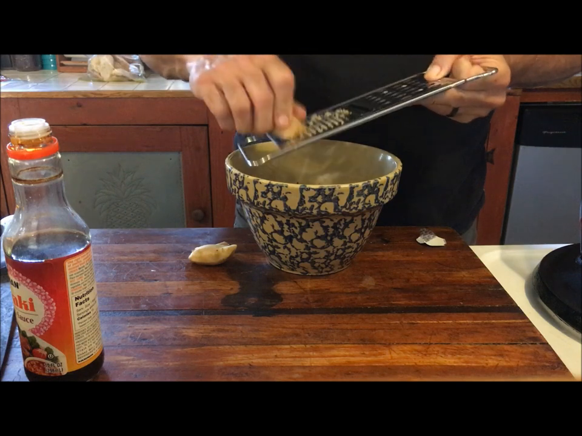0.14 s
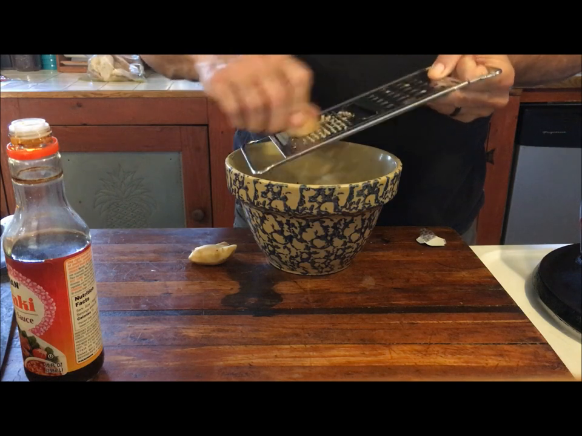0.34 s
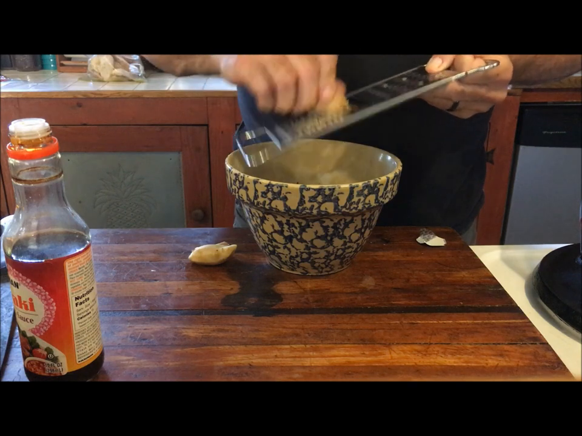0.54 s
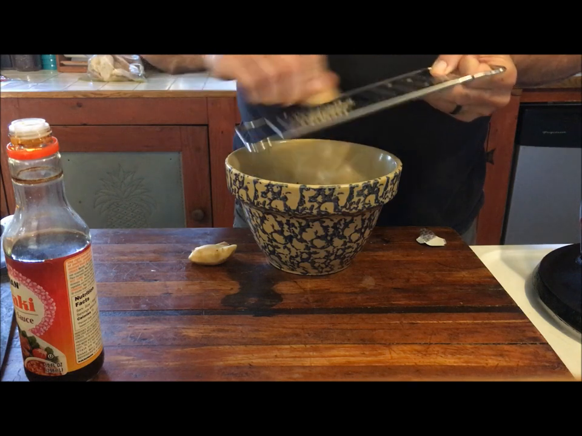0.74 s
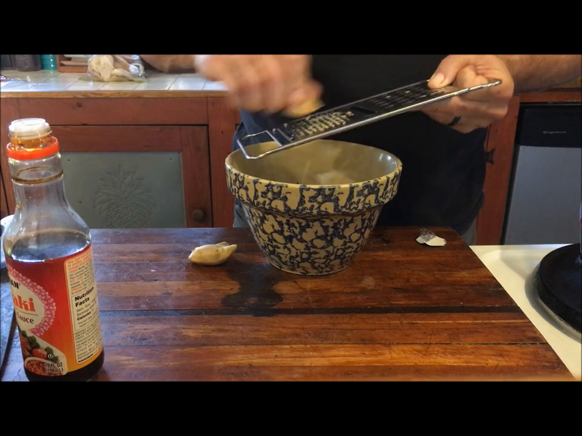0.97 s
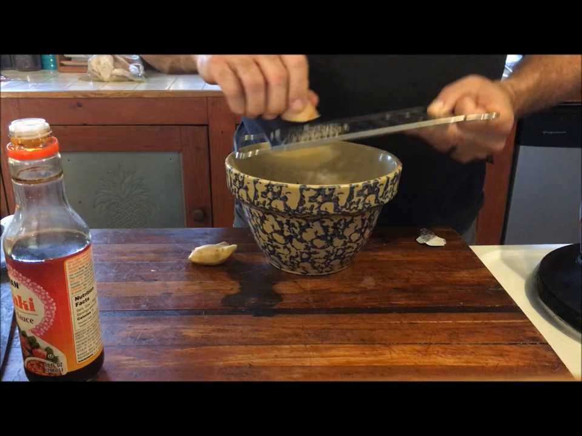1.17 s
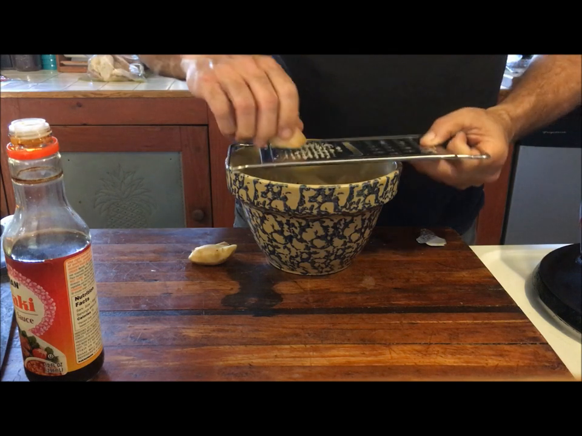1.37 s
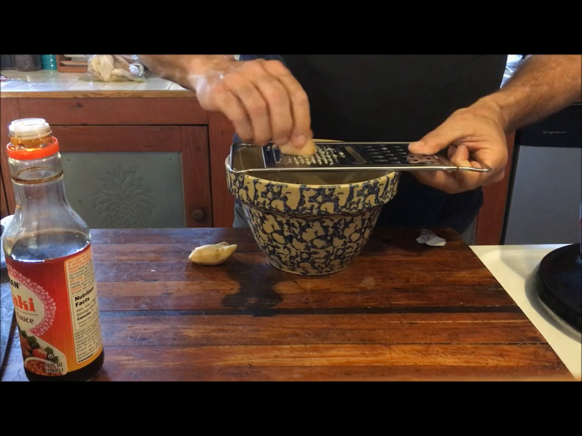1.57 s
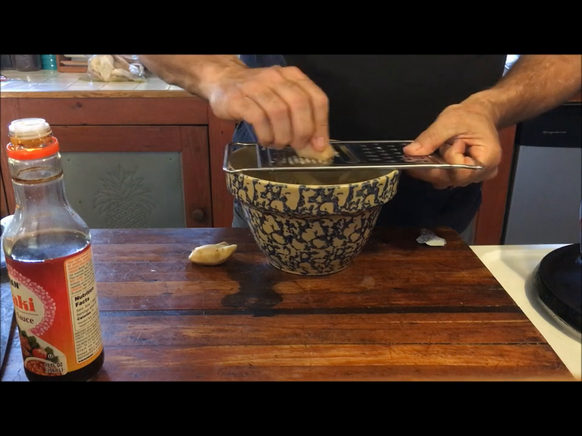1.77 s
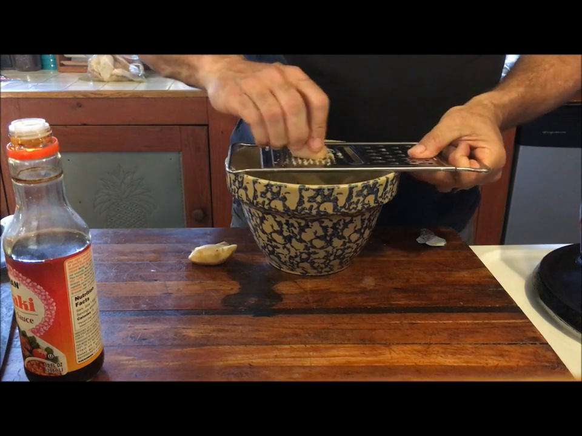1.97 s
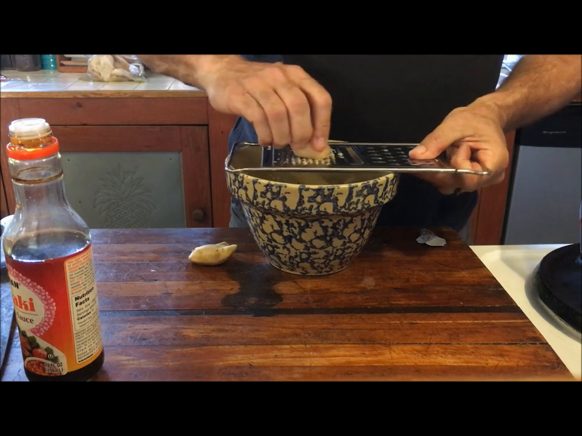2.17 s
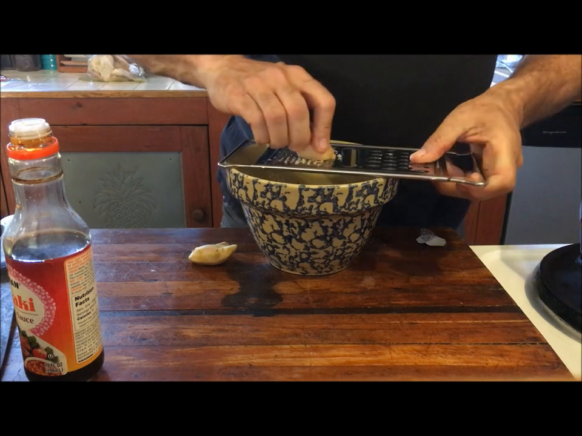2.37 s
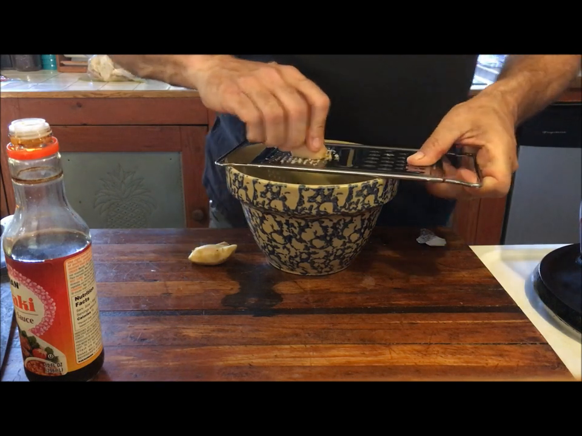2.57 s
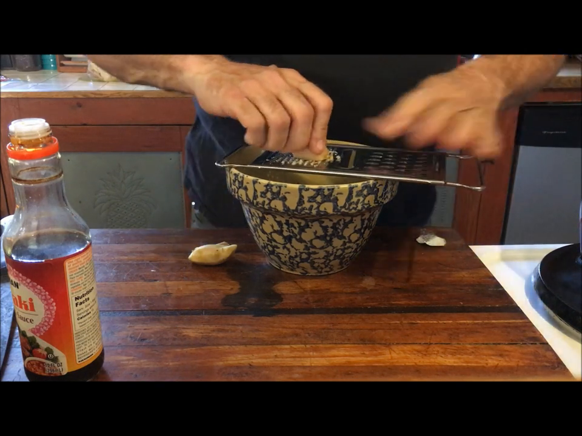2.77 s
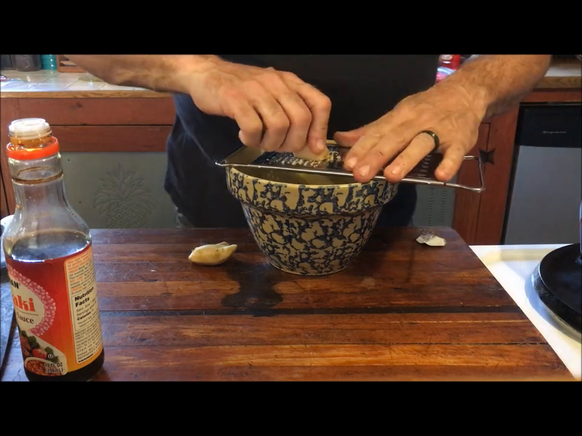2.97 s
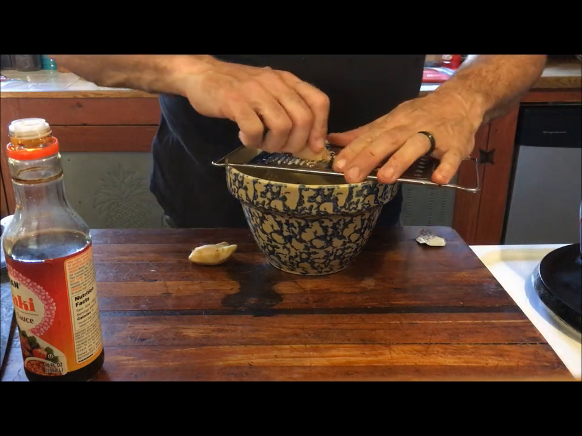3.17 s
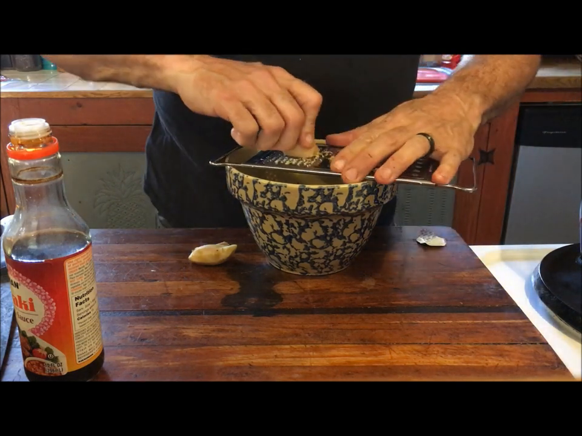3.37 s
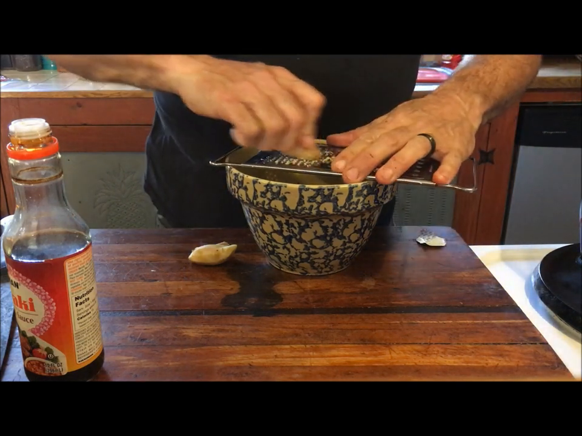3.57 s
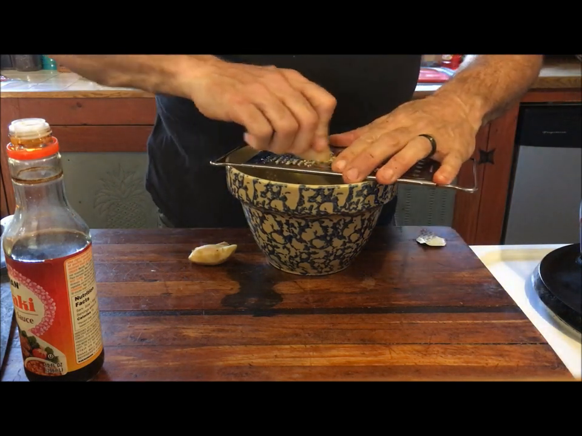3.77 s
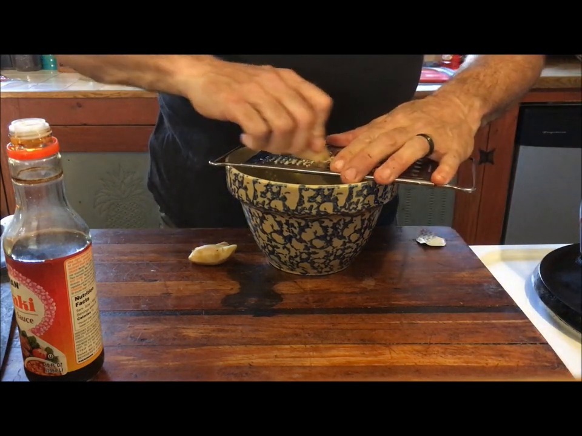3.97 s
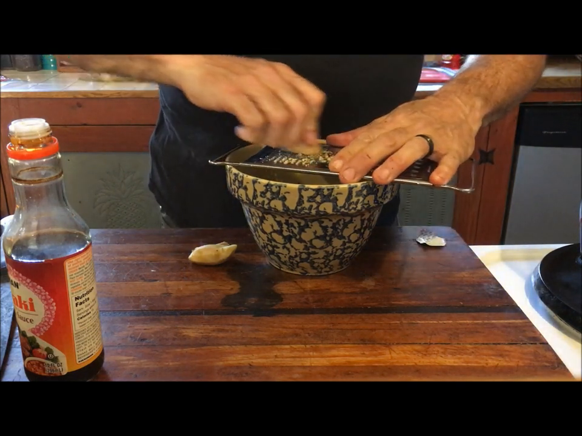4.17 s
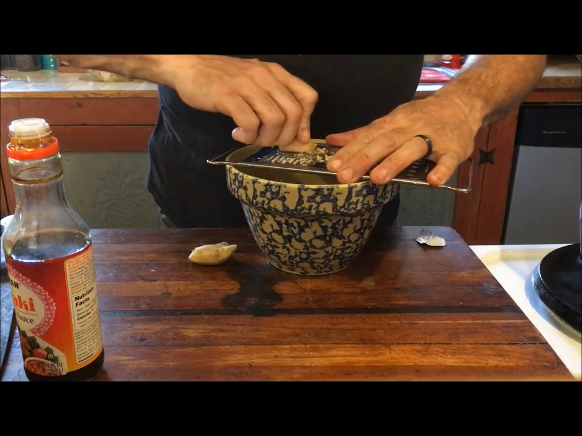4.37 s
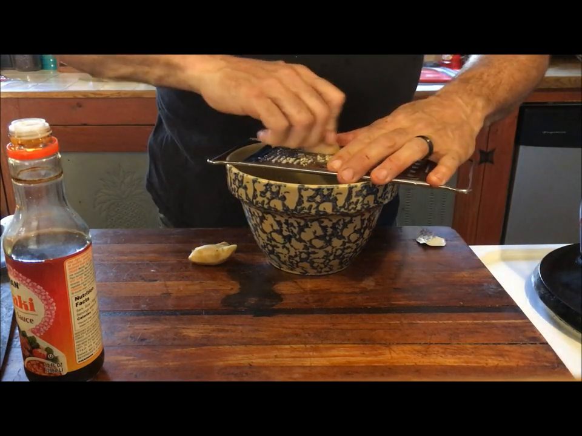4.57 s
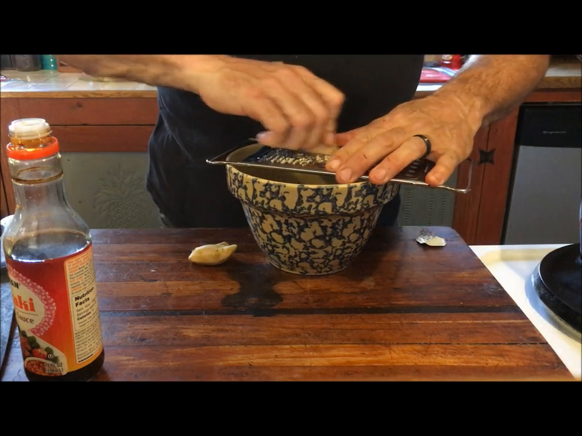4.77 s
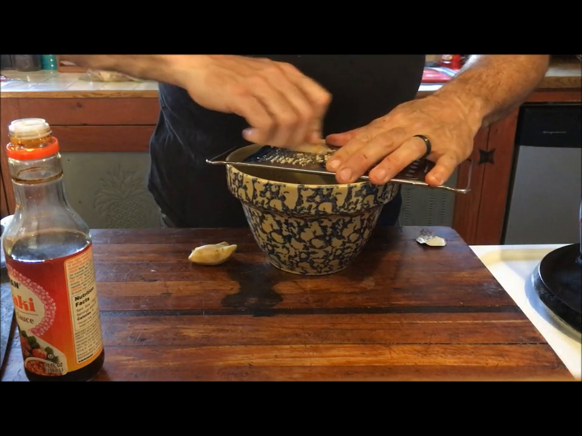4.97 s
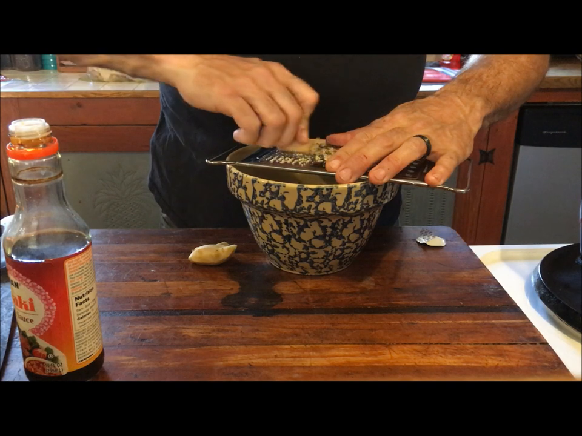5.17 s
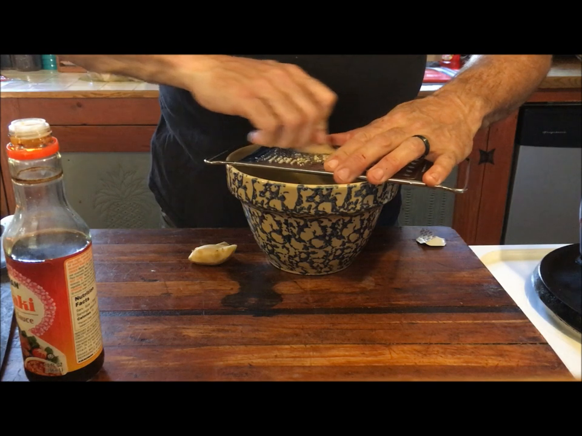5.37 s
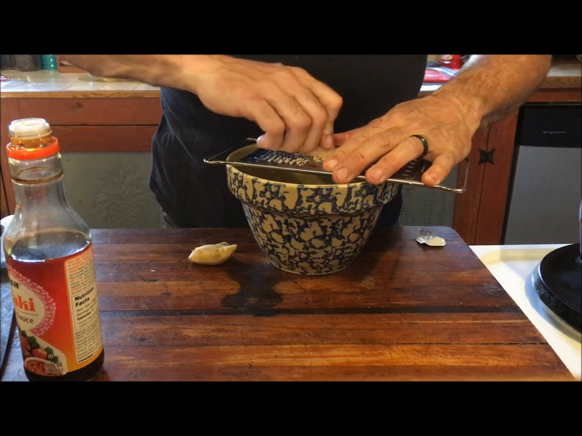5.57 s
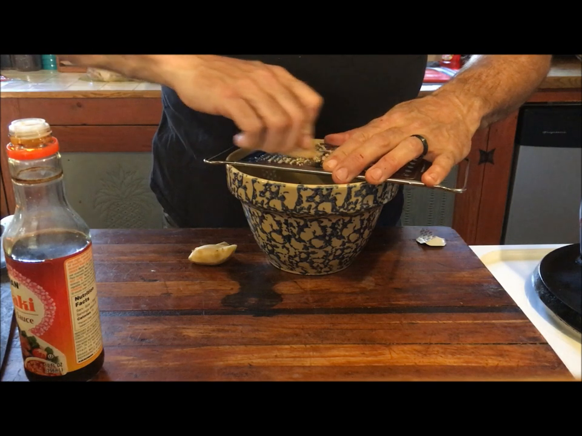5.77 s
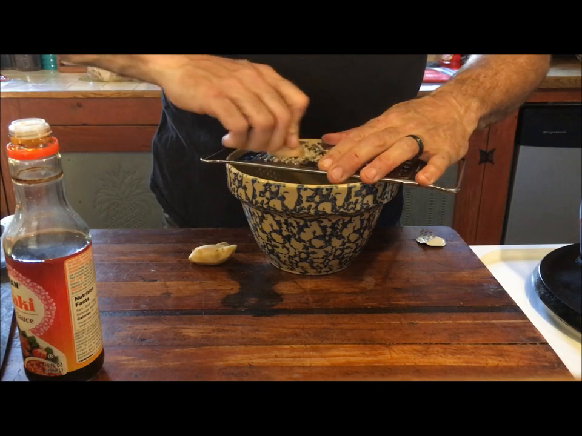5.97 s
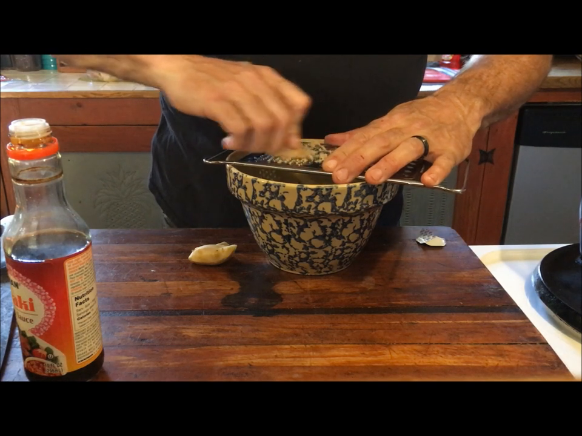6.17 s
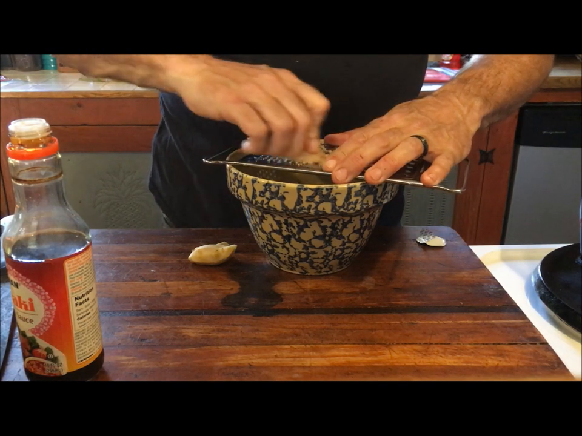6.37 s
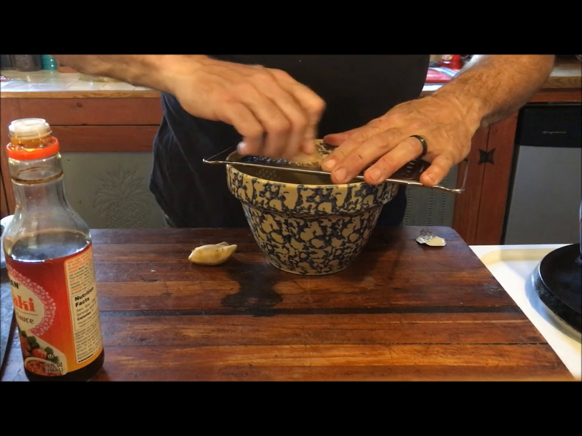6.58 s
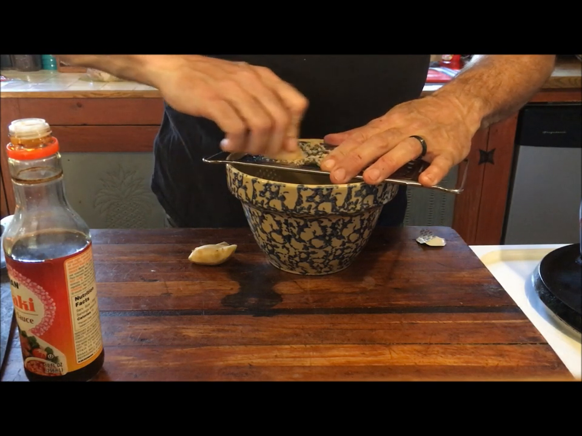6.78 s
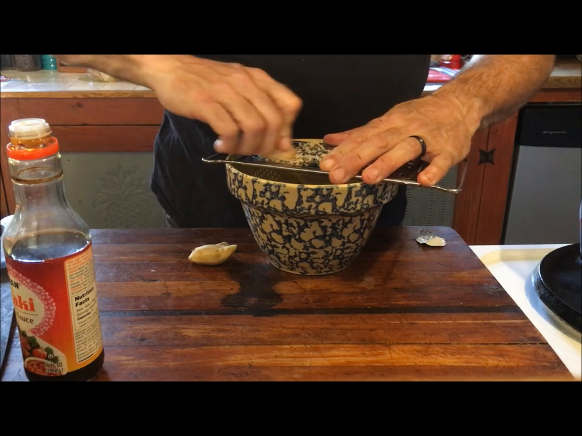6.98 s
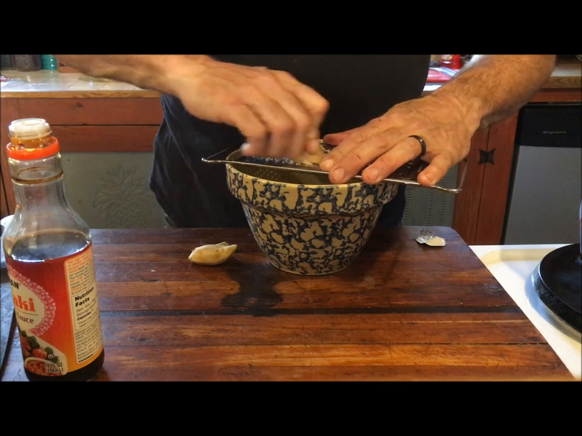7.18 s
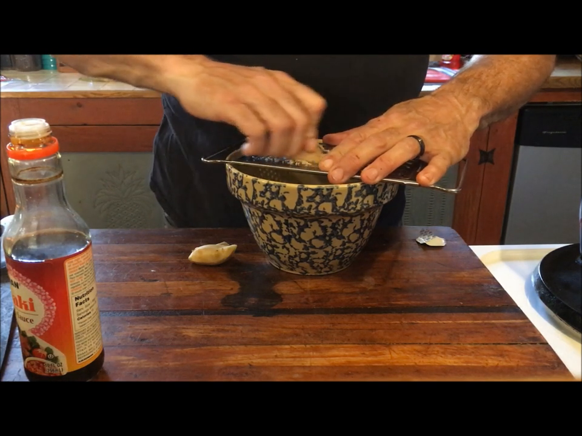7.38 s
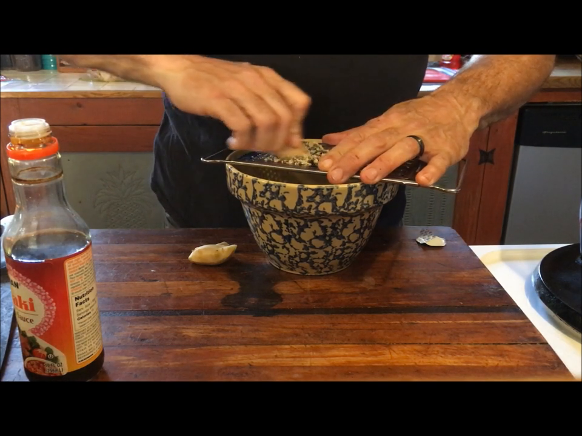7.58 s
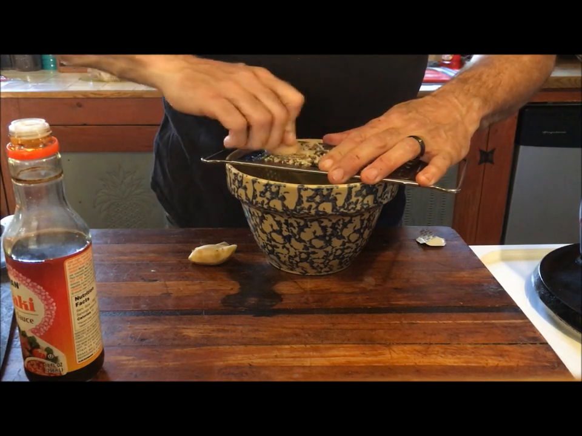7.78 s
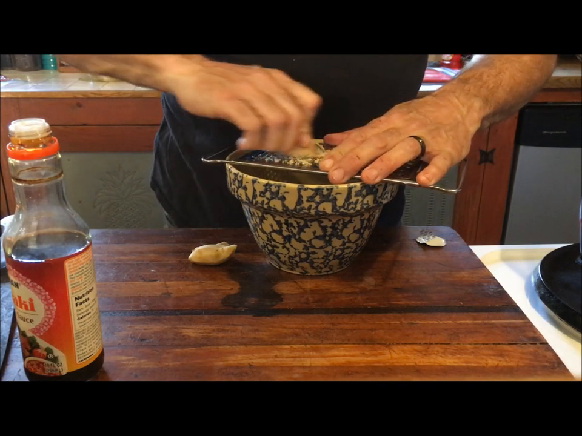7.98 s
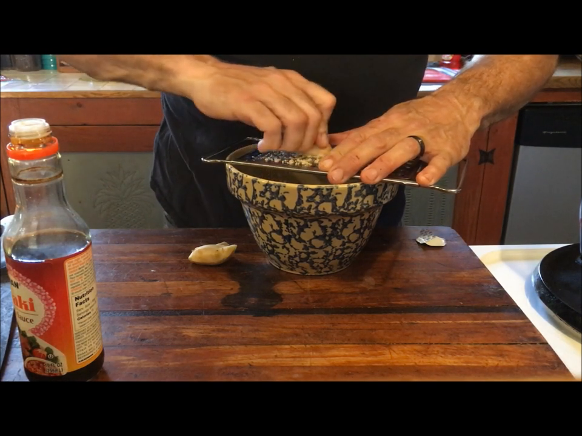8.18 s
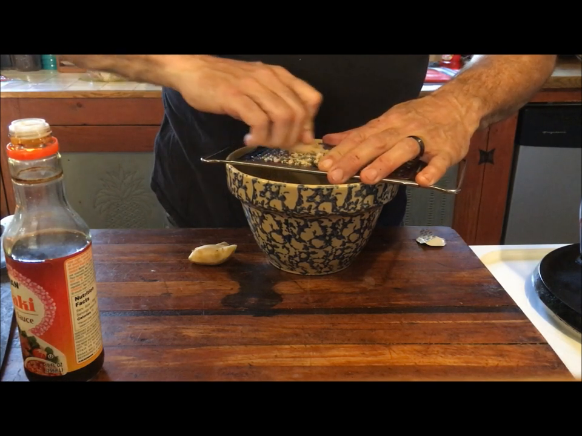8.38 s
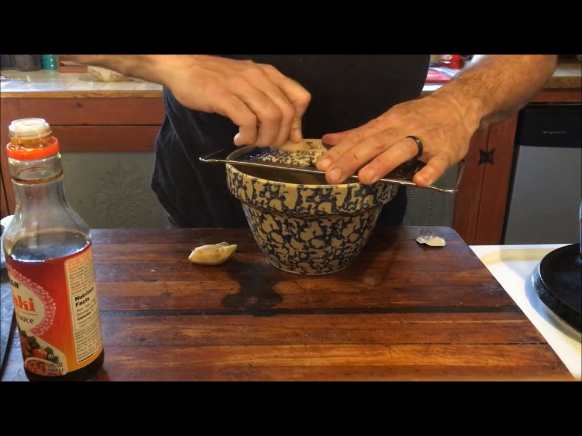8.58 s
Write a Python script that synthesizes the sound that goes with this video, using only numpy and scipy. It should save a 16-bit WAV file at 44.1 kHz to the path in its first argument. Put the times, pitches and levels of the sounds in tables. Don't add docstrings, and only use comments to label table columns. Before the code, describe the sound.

Ginger root rasped on a steel grater over a stoneware bowl: a few light scrapes, bright rim clinks, then fast hissing strokes with wooden knocks.

```python
import sys
import numpy as np
from scipy import signal
from scipy.fft import rfft, irfft
from scipy.io import wavfile
from scipy.ndimage import uniform_filter1d

SR = 44100
rng = np.random.default_rng(int(sys.argv[2]) if len(sys.argv) > 2 else 0)


def to_linear_factor(level_db):
    exponent = np.asarray(level_db, float) / 20
    return 10 ** exponent


def bounce(signal):
    frames = np.transpose(np.atleast_2d(signal))
    limited = np.clip(frames, -1, 1)
    pcm = np.round(limited * 32767).astype(np.int16)
    wavfile.write(sys.argv[1], SR, pcm)


N = 380564

# f/Hz, level/dB
KITCHEN_TONE = [(15, -65), (25, -26.5), (53, -6.5), (74, -6.5), (134, -29), (256, -26.5), (309, -33.5),
                (439, -31), (489, -42.5), (1700, -63.5), (16000, -76)]
# f/Hz, time to fade by 60 dB/s
ECHO_TIMES = [(80, 0.91), (300, 0.27), (1200, 0.5), (5000, 0.27), (14000, 0.17)]

# f/Hz, level/dB, time to fade by 60 dB/s
COUNTER_LOW = [(85.4, -13, 0.69), (96.6, -9, 0.37), (144.3, 2, 0.15), (181.6, -2.5, 0.17),
               (200.5, -5, 0.17)]
COUNTER_MID = [(253, -16, 0.1), (288.4, -1, 0.18), (338, -0.5, 0.035), (381.2, -1.5, 0.13),
               (433, -3.5, 0.054)]
COUNTER_HIGH = [(466, -1, 0.023), (553.6, -8, 0.07), (616.7, 1, 0.038), (703, 0, 0.04), (807, -3.5, 0.038)]
COUNTER_TOP = [(1000, -13, 0.12), (1115, 14, 0.05), (1222, 7.5, 0.047), (1327, 19.5, 0.028),
               (1714, 10, 0.029), (2010, 4.5, 0.012)]
# f/Hz, level/dB
THUD_TONE = [(24, -29.5), (45, -33.5), (144, 9.5), (278, -5.5), (421, -6.5), (490, -16), (620, -12.5),
             (800, -17), (999, -25), (1250, -23), (2210, -42), (2500, -34.5), (3250, -65), (5500, -120)]
# t/s, peak level/dB, sharp part below it/dB, body below it/dB
KNOCKS = [(0.653, -35.5, -13, -12), (1.282, -39, -29, -14), (1.908, -41, -25, -5), (3.43, -38, -16, -24),
          (3.69, -35.5, -23, -29), (3.784, -31, -19, -14), (3.894, -24, -9.5, -12.5), (4.098, -43, -7, -9),
          (4.403, -22.5, -16.5, -10), (4.658, -18.5, -9.5, -11.5), (4.852, -29.5, -30, -15),
          (4.924, -22, -5.5, -12), (5.189, -19, -7, -14.5), (5.371, -24, -23, -17),
          (5.452, -21, 0.5, -12.5), (5.639, -33.5, -26, -37), (5.703, -25.5, -17, -11),
          (5.884, -28, -20, -24), (5.963, -21.5, -9.5, -14), (6.229, -18, -5, -15.5),
          (6.473, -20.5, -5, -12), (6.679, -26, -22, -11.5), (6.739, -18, -1.5, -22.5),
          (6.994, -16, -0.5, -16.5), (7.19, -25, -30, -18), (7.273, -28, -25, -11), (7.45, -25, -10.5, -15),
          (7.526, -26.5, -10, -12), (7.785, -26.5, -16.5, -14), (8.049, -23, -7, -11),
          (8.238, -55, -16, -20), (8.341, -35, -10, -19), (8.464, -54.5, 9.5, -16), (8.586, -17, -1.5, -19)]

# f/Hz, level/dB, time to fade by 60 dB/s
BOWL_HUM = [(692, 1, .06), (637, -4, 0.054), (743, -7.5, .04)]
# f/Hz, level/dB, time to fade by 60 dB/s
BOWL = [(689, 14, 0.064), (744, 8.5, 0.022), (1277, 9, 0.084), (2620, -0.5, 0.11), (3200, -9.5, 0.17),
        (4120, -2, 0.03), (4740, 2, 0.03)]
# f/Hz, level/dB, time to fade by 60 dB/s
RIM_HIGH = [(4245, 0, .055), (4200, -5, .045), (4290, -5, .05), (4255, -19, .11), (4465, -13, .05),
            (4050, -14, .03)]
RIM_LOW = [(2335, 0, .075), (2280, -5, .05), (2395, -6, .05), (2730, -10, .06), (3000, -12, .03)]

# f/Hz, level/dB, time to fade by 60 dB/s
FREE_RASP = [(430, 0, 0.035), (500, -3, .03), (685, -1, 0.035)]
FREE_RASP_TOP = [(800, 0, .06), (1080, -8, .02), (1250, -12, .015)]
# f/Hz, level/dB, time to fade by 60 dB/s
FRAME_HELD = [(900, 3, .04), (1900, -3, .04), (640, -5, 0.031), (1390, -15.5, .05), (3250, -16, .03)]
FRAME_LAID = [(920, -10, 0.071), (1357, 0.5, 0.083), (1390, 1, 0.024), (1060, -3, 0.018), (1940, -5, 0.071),
              (655, -2.5, 0.055), (3250, -5, 0.043)]
# f/Hz, level/dB, time to fade by 60 dB/s
STEEL = [(3280, -10, .03), (5280, -8, .03), (5650, -2, .04), (5900, 0, .05), (6150, -6, .03),
         (6580, -7, .05), (6900, -8, .04), (7570, -3, .05), (8200, -6, .03), (9400, -7, .03)]
STEEL_TOP = [(11000, 5, 0.0099), (11650, -4, .012), (12260, 3.5, .014), (12500, -3.5, 0.013),
             (12400, -0.5, .014), (13680, -1.5, 0.017), (14400, -15.5, .01), (15330, 2.5, .014)]

# t/s, peak level/dB, sharp part relative to it/dB
LANDINGS = [
    (0.04, -36, 1.5),
    (0.313, -36.5, -0.5),
    (0.575, -33.5, -6),
    (0.835, -38, -9),
    (1.119, -58.5, -12.5),
]
# t/s, length/s, upper ring level/dB, lower ring level/dB
SINGS = [
    (1.3, 0.044, -55, -60),
    (1.39, .04, -48, -56),
    (1.53, .05, -49, -45),
    (1.578, 0.052, -50, -50.5),
    (1.876, 0.032, -49, -61),
    (2.02, 0.056, -64.5, -62),
    (2.275, 0.14, -57.5, -57),
    (2.66, .07, -59.5, -73),
    (3.11, 0.022, -62, -60.5),
    (3.192, 0.013, -61, -58),
]
# t/s, peak level/dB, f/Hz, time to fade by 60 dB/s
PINGS = [(0.1062, -42, 3300, .035), (0.6522, -42, 880, .12), (0.6532, -31, 7600, .08),
         (0.654, -40, 2300, .16), (1.3772, -24, 4245, .07), (1.493, -33, 4245, .07),
         (1.5052, -41, 700, .045), (1.5232, -34, 5950, .05), (1.8992, -33, 2340, .08),
         (1.9082, -35, 1450, .04), (2.3102, -51, 1200, .07), (2.6862, -45, 1370, .055),
         (2.7082, -47, 1990, .03), (3.1202, -54, 1390, .075), (3.2032, -55, 1400, .045),
         (3.2042, -55, 3700, .03), (3.4182, -41, 2335, .15), (3.4262, -49, 700, .075)]
# t/s, peak level/dB, centre f/Hz, time to fade by 60 dB/s
TICKS = [(1.2803, -31.5, 9000, 0.027), (1.3766, -1.5, 12100, 0.011), (1.449, -27, 5800, 0.037),
         (1.4912, -24, 9000, 0.022), (1.5171, -15, 9000, .025), (1.522, -13, 15100, 0.025),
         (1.535, -19, 11900, .021), (1.548, -24.5, 11100, 0.019), (1.561, -24.5, 9000, 0.02),
         (1.588, -33, 7000, .02), (1.604, -32.5, 5000, 0.02), (1.613, -28, 5930, 0.029),
         (1.7833, -35.5, 3470, 0.034), (1.9, -31, 2400, 0.033), (1.906, -23, 6000, 0.026),
         (2.0068, -31, 4000, .03), (2.239, -44, 2100, .04), (2.282, -40, 12000, .04),
         (2.292, -35, 13000, .03), (2.326, -35, 3200, 0.027), (2.352, -39, 8600, .04),
         (2.385, -37, 9000, 0.044), (2.39, -41, 5000, .02), (2.453, -33.5, 3970, 0.049),
         (2.552, -43, 13500, .03), (2.659, -47, 4200, 0.028), (2.6825, -36, 2500, 0.036),
         (2.693, -39.5, 1400, 0.04), (2.701, -40, 14000, .03), (2.709, -32, 2000, .03),
         (3.0374, -54.5, 1400, 0.047), (3.3504, -48, 1300, 0.064), (3.387, -50, 6040, .03)]
# upper ring/dB, lower ring/dB, rasp frame/dB
CLINKS = [(0.1052, -11, -26.5, -28, -36), (0.649, -6, -17.5, -21, -23), (1.2814, -14, -14, -14, -22.5),
          (1.3776, -4, -17, -23, -30), (1.4217, -19, -24, -15, -35), (1.492, -22.5, -12.5, -15, -7),
          (1.5202, -8.5, -37, -25, -36), (1.5345, -14.5, -24, -16, -32), (1.5744, -24, -17, -16, -16),
          (1.7842, -36, -23, -3, -5), (1.8775, -28.5, -15, -24, -30), (1.904, -17, -19.5, -8, -14),
          (2.0071, -32.5, -18, -17, -22), (2.2415, -45, -22, -10, -17), (2.274, -37, -15, -18, -28),
          (2.453, -33, -16, -20, -10), (2.6566, -46, -16, -18, -19), (2.6814, -41.5, -11, -21, 0),
          (2.7094, -43, -20, -14, -6), (2.7852, -42.5, -23, -6, -11), (2.9694, -47, -28, -18, -17),
          (3.1097, -46.5, -20, -12, -12), (3.199, -39, -13, -5, -8), (3.416, -26.5, -16.5, -8.5, -20.5)]
# f/Hz, level/dB
CRACK_TONE = [(290, -31), (500, -2), (2370, -7), (2850, -1.5), (4210, 1.5), (5080, -6), (5860, 5),
              (7270, 2.5), (13300, 2), (15600, -5)]

# t/s at full speed, length/s, scrape level/dB, rim friction level/dB
AIR = [
    (.09, 0.092, -46.5, -54.5),
    (.36, 0.078, -47.5, -62),
    (.63, 0.1, -46, -56),
    (.885, 0.032, -46, -58.5),
    (.93, 0.047, -53, -59.5),
    (.99, 0.057, -64, -75),
]
# t/s, length/s, scrape level/dB, rim friction level/dB
SLIDES = [(1.322, 0.0143, -66, -56.5), (1.389, 0.081, -65.5, -48.5), (1.519, 0.11, -52.5, -44),
          (1.707, 0.15, -60.5, -61.5), (1.889, 0.055, -47.5, -50), (1.978, 0.11, -58, -56.5),
          (2.239, 0.19, -55.5, -57), (2.452, 0.011, -62, -50.5), (2.496, 0.083, -59, -64),
          (2.689, 0.015, -55, -50.5), (2.776, 0.06, -63.5, -58.5), (2.895, 0.22, -71.5, -67),
          (3.108, 0.03, -63, -59.5), (3.2, 0.11, -62.5, -66.5), (3.4, 0.073, -50.5, -62)]
# t/s at full speed, length/s, scrape level/dB, weight on the bowl/dB
FORWARD = [(3.656, 0.066, -44, -46.5), (3.897, 0.08, -49, -57), (4.149, 0.057, -44.5, -46.5),
           (4.395, 0.064, -43.5, -45), (4.659, 0.069, -44, -51), (4.934, 0.072, -41.5, -45),
           (5.203, 0.064, -42, -51), (5.465, 0.068, -42, -40.5), (5.728, 0.07, -42, -49),
           (5.985, 0.059, -41.5, -43), (6.237, 0.066, -40.5, -46), (6.492, 0.071, -42, -40),
           (6.754, 0.061, -42.5, -44.5), (7.008, 0.086, -43.5, -53), (7.291, 0.067, -42, -43.5),
           (7.548, 0.074, -42, -45.5), (7.804, 0.067, -43.5, -43), (8.064, 0.075, -43, -42),
           (8.329, 0.071, -42, -43), (8.599, 0.028, -41, -53)]
# t/s at full speed, length/s, scrape level/dB
BACK = [(3.546, 0.044, -54), (3.785, 0.06, -53), (4.032, 0.05, -52.5), (4.276, 0.052, -47),
        (4.526, 0.064, -48.5), (4.816, 0.056, -49.5), (5.087, 0.048, -49.5), (5.348, 0.058, -47),
        (5.61, 0.06, -48.5), (5.866, 0.063, -49), (6.117, 0.068, -49.5), (6.388, 0.045, -45),
        (6.648, 0.051, -47.5), (6.905, 0.046, -47.5), (7.177, 0.065, -50), (7.445, 0.044, -47),
        (7.679, 0.054, -48.5), (7.96, 0.032, -46), (8.207, 0.071, -47), (8.476, 0.064, -49.5)]
# f/Hz, level/dB
SCRAPE_TONE = [(530, -24.5), (900, -16.5), (1000, -11), (1290, -4.5), (2150, -10.5), (3040, -7.5),
               (4900, -8), (6000, -3), (6680, -8), (9230, -1), (10500, -7.5), (12900, 2.5), (15600, -4.5)]


def colour(x, points):
    hz, db = np.transpose(points)
    grid_hz = np.maximum(np.arange(2049) * SR / 4096, 1)
    log_gain = np.log(to_linear_factor(np.interp(np.log(grid_hz), np.log(hz), db)))
    cepstrum = irfft(log_gain)
    cepstrum[1:2048] *= 2
    cepstrum[2049:] = 0
    return signal.oaconvolve(x, irfft(np.exp(rfft(cepstrum))))[:len(x)]


def unit(x):
    return x / np.sqrt(np.mean(x ** 2))


def seconds(length_s):
    return np.arange(int(SR * length_s)) / SR


def fade_in(t, rise_s):
    return np.clip(t / rise_s, 0, 1)


def decay(t, t60):
    return to_linear_factor(-60 * t / t60)


def ring(modes, spread_db=0., detune=0., sign=-1):
    hz, db, t60 = np.transpose(modes)[:, :, None]
    chance = rng.standard_normal((2, len(modes), 1))
    t = seconds(np.max(t60))
    waves = np.sin(2 * np.pi * hz * (1 + detune * chance[0]) * t)
    waves = waves * sign ** np.arange(len(modes))[:, None]
    sound = np.sum(to_linear_factor(db + spread_db * chance[1] - 60 * t / t60) * waves, axis=0)
    return sound / np.max(np.abs(sound))


def excite(force, modes):
    body = ring(modes)
    return signal.oaconvolve(force, body / np.linalg.norm(body))[:N]


def add(track, s, sound):
    i = int(s * SR)
    track[i:i + len(sound)] += sound[:len(track) - i]


def grains(rate, scatter_db):
    sizes_db = scatter_db * np.minimum(rng.exponential(size=N), 3)
    return (rng.random(N) < rate / SR) * rng.standard_normal(N) * to_linear_factor(sizes_db)


def walk(rate):
    k = int(SR / rate)
    return uniform_filter1d(np.repeat(rng.standard_normal(N // k + 1), k), k)[:N]


def settle(held, resting):
    return np.interp(np.arange(N) / SR, [3.33, 3.73], [held, resting])


def gestures(rows, column, rise_db_s, fall_db_s, lag_s=0.):
    t = np.arange(N) / SR - lag_s
    out = np.full(N, -120.)
    for row in rows:
        s, length, db = row[0], row[1], row[column]
        end = s + length
        near = slice(max(int((s - 1) * SR), 0), int((end + 1) * SR))
        times = [s - 1, s, s + .45 * length, end, end + 1]
        shape_db = np.interp(t[near], times, [-1.5 - rise_db_s, -1.5, .8, -3, -3 - fall_db_s])
        out[near] = np.maximum(out[near], db + shape_db)
    return out


def stroke_db(rows, column, lag_s=0.):
    return gestures(rows, column, rise_db_s=600, fall_db_s=454, lag_s=lag_s)


def slide_db(rows, column):
    return gestures(rows, column, rise_db_s=446, fall_db_s=212)


def rim_drag_db():
    return np.maximum(slide_db(AIR + SLIDES, column=3), settle(-94.5, -67.5))


def kitchen():
    swell_db = 1.8 * walk(5)
    rumble = unit(colour(rng.standard_normal(N), KITCHEN_TONE))
    hiss = unit(colour(rng.standard_normal(N), [(300, 4.5), (1700, -1), (5000, -5.0), (16000, -1.0)]))
    return to_linear_factor(-53 + swell_db) * rumble + to_linear_factor(-67.5) * hiss


def room(x):
    t = seconds(0.5)
    hz, t60 = np.transpose(ECHO_TIMES)
    tail = 0
    for centre in 60 * 2. ** np.arange(9):
        band = colour(rng.standard_normal(len(t)), [(centre / 3, -40), (centre, 0), (centre * 3, -40)])
        tail = tail + band * decay(t, np.interp(np.log(centre), np.log(hz), t60))
    tail = tail * fade_in(t, 0.001)
    return signal.oaconvolve(x, tail / np.linalg.norm(tail))[:N]


def push():
    drag = unit(grains(600, scatter_db=2.5))
    weight_db = gestures(FORWARD, column=3, rise_db_s=193, fall_db_s=116, lag_s=0.011)
    rim_db = uniform_filter1d(rim_drag_db(), size=SR // 20)
    low_db = np.max([weight_db, 0.66 * rim_db - 17.0, settle(-67, -53.5)], axis=0)
    idle_db = settle(-89.5, -86) + 0.84 * walk(10)
    board_db = np.max([rim_db - 4.5, idle_db, stroke_db(BACK, column=2) - 10.5], axis=0)
    hum_db = stroke_db(BACK, column=2, lag_s=0.024) - 9
    low_modes = COUNTER_LOW + [(hz, db - 5.0, t60) for hz, db, t60 in COUNTER_MID]
    hum = excite(to_linear_factor(hum_db) * drag, BOWL_HUM)
    low = excite(to_linear_factor(low_db) * drag, low_modes)
    return hum + low + excite(to_linear_factor(board_db) * drag, COUNTER_HIGH)


def knocks():
    out, t = np.zeros(N), seconds(0.25)
    bounce_modes = COUNTER_HIGH[1:] + [(803, 8, .05), (1300, -5, .04)]
    roars = unit(colour(rng.standard_normal(len(t) * len(KNOCKS)), THUD_TONE)).reshape(-1, len(t))
    roars = roars * fade_in(t, 0.0026) * to_linear_factor(-60 * t / 0.6 - 6.3 * (t / 0.17) ** 2)
    for (s, db, sharp_db, body_db), roar in zip(KNOCKS, roars):
        board = np.zeros(SR // 3)
        add(board, .001, to_linear_factor(1.5 * sharp_db - 3) * ring(COUNTER_TOP, spread_db=2, detune=.015))
        add(board, .002, to_linear_factor(0.87 * sharp_db + 1.5) * ring(COUNTER_HIGH, spread_db=0.25, detune=0.0088))
        add(board, .0012, to_linear_factor(body_db + 4.0) * ring(COUNTER_MID, spread_db=1.5, detune=0.012))
        add(board, 0.031, to_linear_factor(sharp_db - 11) * ring(bounce_modes, spread_db=2.5, detune=0.012))
        low = ring(COUNTER_LOW, spread_db=1.5, detune=0.012, sign=0.96)
        add(board, .004, to_linear_factor(0.2) * low * fade_in(np.arange(len(low)) / SR, 0.0082))
        board = board * fade_in(np.arange(len(board)) / SR, .004)
        shudder = rng.standard_normal(len(t)) * to_linear_factor(-31.5) * decay(t, 0.23)
        shudder[0] = 1
        add(out, s, to_linear_factor(db) * signal.oaconvolve(board, shudder))
        add(out, s, to_linear_factor(db - 10.5) * roar)
    return out


def landings():
    out, t = np.zeros(N), seconds(0.05)
    for s, db, sharp_db in LANDINGS:
        bend = ring(FREE_RASP, spread_db=2, detune=.02)
        add(out, s, to_linear_factor(db) * bend * fade_in(np.arange(len(bend)) / SR, 0.0019))
        add(out, s, to_linear_factor(db + sharp_db - 5.5) * ring(FREE_RASP_TOP, spread_db=3, detune=.02))
        wet_tick = rng.standard_normal(len(t)) * decay(t, 0.048)
        add(out, s, to_linear_factor(db + sharp_db / 2 - 15) * wet_tick)
    return out


def sings():
    rub = rng.standard_normal(N) * to_linear_factor(2.5 * walk(80))
    damping = .55
    high_modes = [(hz, db, damping * t60) for hz, db, t60 in RIM_HIGH]
    low_modes = [(hz, db, damping * t60) for hz, db, t60 in RIM_LOW]
    high = excite(to_linear_factor(stroke_db(SINGS, column=2)) * rub, high_modes)
    return high + excite(to_linear_factor(stroke_db(SINGS, column=3)) * rub, low_modes)


def pings():
    out, t = np.zeros(N), seconds(0.02)
    for s, db, hz, t60 in PINGS:
        rub = rng.standard_normal(len(t)) * decay(t, .03)
        pair = ring([(hz, 0, t60), (1.04 * hz, -4, 0.77 * t60)])
        add(out, s, to_linear_factor(db) * signal.oaconvolve(pair, rub / np.linalg.norm(rub)))
    return out


def ticks():
    out, t = np.zeros(N), seconds(1 / 16)
    for s, db, hz, t60 in TICKS:
        burst = unit(colour(rng.standard_normal(len(t)), [(hz / 6, -22), (hz, 0), (hz * 1.5, -14)]))
        add(out, s, to_linear_factor(db - 8) * decay(t, t60) * fade_in(t, .0005) * burst)
    return out


def clinks():
    out, t = np.zeros(N), seconds(0.1)
    cracks = unit(colour(rng.standard_normal(len(t) * len(CLINKS)), CRACK_TONE)).reshape(-1, len(t))
    cracks = cracks * fade_in(t, 0.00027) * (decay(t, 0.035) + to_linear_factor(-11.0) * decay(t, 0.18))
    for (s, db, high_db, low_db, frame_db), crack in zip(CLINKS, cracks):
        frame = FRAME_LAID if s > 1.2 else FRAME_HELD
        treble_db = max(db + 6.0, -27)
        blow = np.zeros(SR // 3)
        add(blow, 0, to_linear_factor(high_db + 8.0) * ring(RIM_HIGH, spread_db=1.2, detune=0.003))
        add(blow, 0, to_linear_factor(low_db - 1.0) * ring(RIM_LOW, spread_db=1.2, detune=0.003))
        add(blow, 0, to_linear_factor(frame_db) * ring(frame, spread_db=2, detune=.01))
        add(blow, 0, to_linear_factor(-10.5) * ring(STEEL, spread_db=2.5, detune=0.005))
        add(blow, 0, to_linear_factor(treble_db) * ring(STEEL_TOP, spread_db=2.5, detune=0.004))
        skid = rng.standard_normal(900) * to_linear_factor(-17) * decay(t[:900], .022)
        skid[0] = 1
        add(out, s, to_linear_factor(db) * signal.oaconvolve(blow, skid) / np.linalg.norm(skid))
        add(out, s, to_linear_factor(db - 14.0) * crack)
    return out


def rim_slide():
    slips = unit(grains(2500, scatter_db=0.5)) * to_linear_factor(rim_drag_db() + 2.2 * walk(60))
    rings = to_linear_factor(-10.5) * excite(slips, RIM_HIGH) + to_linear_factor(-18.5) * excite(slips, RIM_LOW)
    rings = rings + to_linear_factor(-13.0) * excite(slips, FRAME_LAID) + to_linear_factor(-10.5) * excite(slips, STEEL)
    grit = colour(slips, [(120, -11.0), (250, 13.5), (500, 6.5), (1000, 7.5), (2500, 3.0), (4900, -2.5),
                          (6000, 3.5), (9000, -32.5)])
    return rings + to_linear_factor(5) * grit


def scrape():
    strokes_db = stroke_db(AIR + FORWARD + BACK, column=2)
    speed_db = np.max([strokes_db, slide_db(SLIDES, column=2), settle(-90.5, -70)], axis=0)
    tears = unit(grains(9000, scatter_db=-1.0))
    fibres = unit(colour(tears, SCRAPE_TONE))
    fibres = fibres + to_linear_factor(-26 + 3.5 * walk(25)) * excite(tears, STEEL)
    fibres = fibres + to_linear_factor(-28.5 + 3 * walk(13)) * excite(tears, RIM_HIGH)
    plate = [(3200, 3.5, 0.19), (2580, -10, .03), (3700, 9.5, 0.023), (5960, 6.0, 0.036)]
    fibres = fibres + to_linear_factor(-23.5 + 5.0 * walk(30)) * excite(tears, plate)
    flutter_db = np.clip(2.3 * walk(90), -3.5, 3.5)
    bowl = settle(.13, 0.6) * to_linear_factor(0.44 * speed_db - 35.0) * excite(tears, BOWL)
    return to_linear_factor(speed_db + flutter_db + 2.5) * fibres + bowl


def scene():
    bowl_and_counter = push() + knocks() + landings() + sings()
    near = bowl_and_counter + pings() + ticks() + clinks() + rim_slide() + scrape()
    return (near + to_linear_factor(-13) * room(near) + kitchen())[None, :]


def roll_off(x):
    return signal.sosfilt(signal.butter(12, 16990, fs=SR, output="sos"), x)


def record(dry):
    no_bass = signal.butter(3, 42, "high", fs=SR, output="sos")
    no_top = signal.ellip(10, .2, 80, 15900, fs=SR, output="sos")
    mix = signal.sosfilt(no_top, signal.sosfilt(no_bass, dry))
    return roll_off(mix)


dry = scene()
out = record(dry)
bounce(out)
```